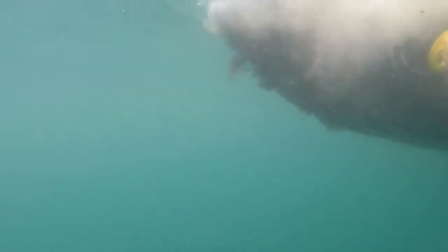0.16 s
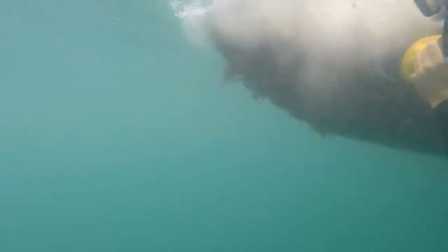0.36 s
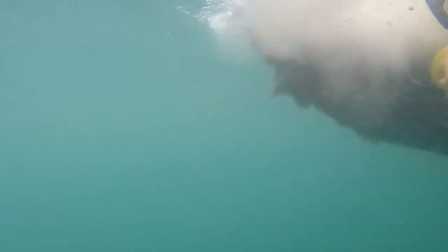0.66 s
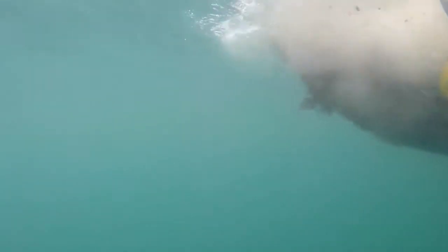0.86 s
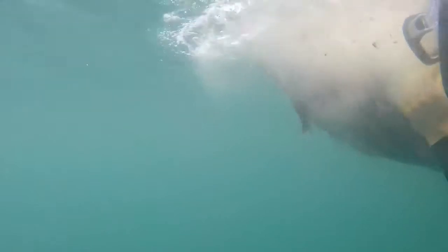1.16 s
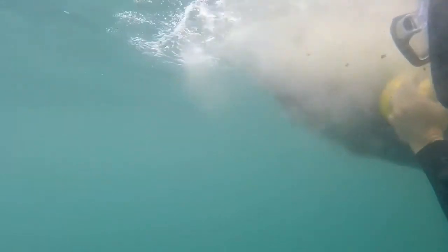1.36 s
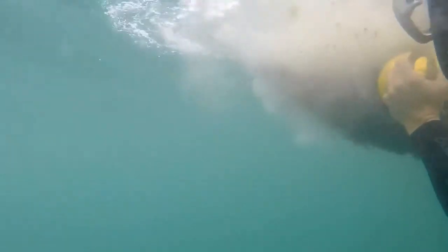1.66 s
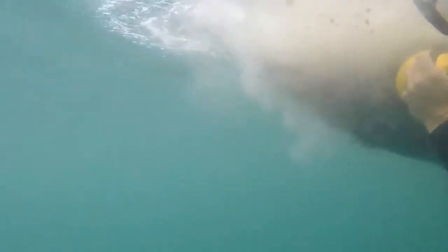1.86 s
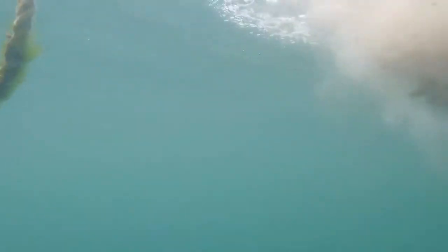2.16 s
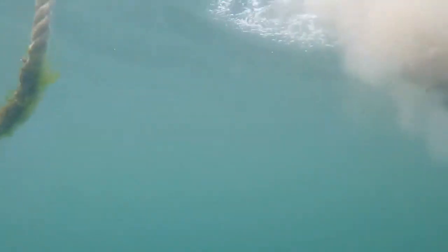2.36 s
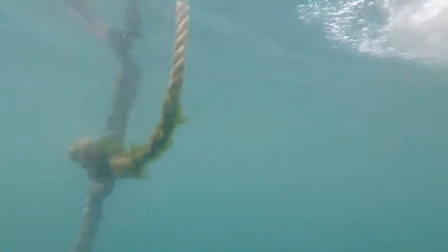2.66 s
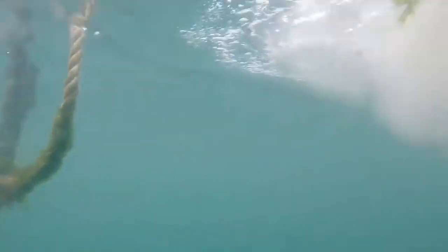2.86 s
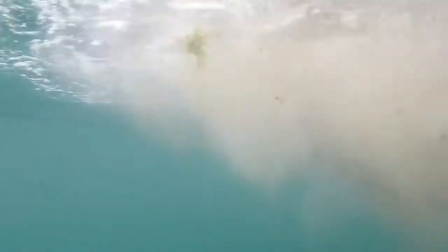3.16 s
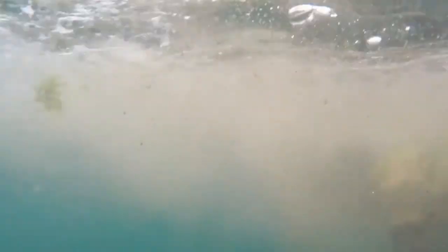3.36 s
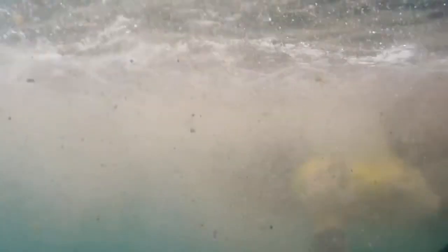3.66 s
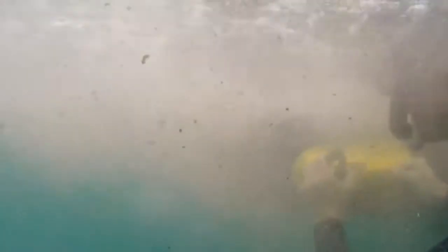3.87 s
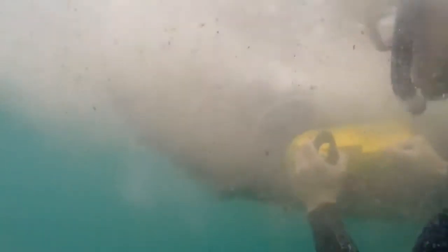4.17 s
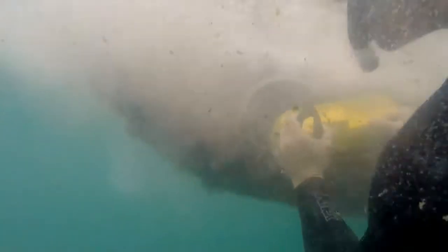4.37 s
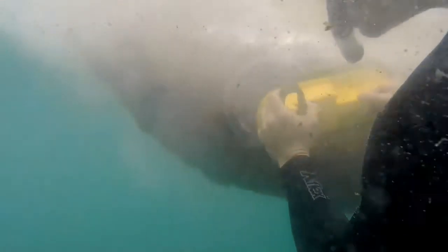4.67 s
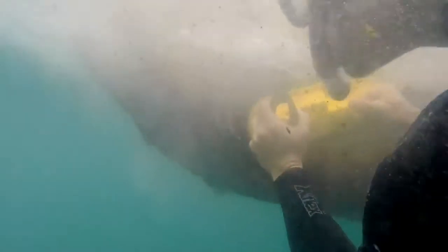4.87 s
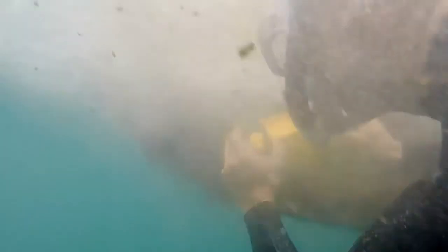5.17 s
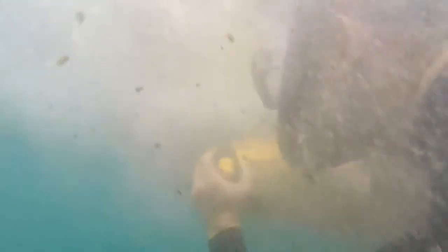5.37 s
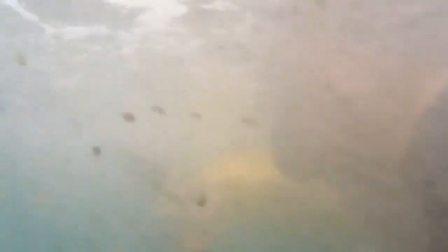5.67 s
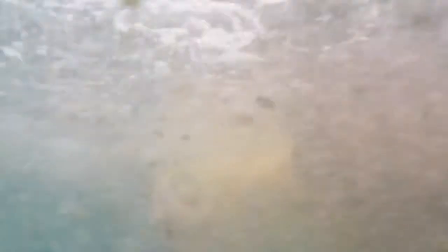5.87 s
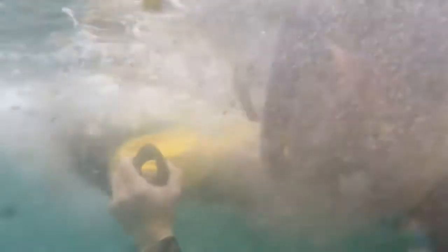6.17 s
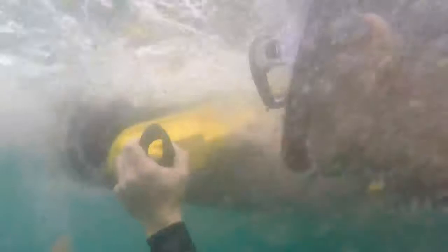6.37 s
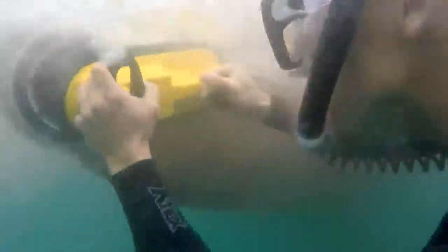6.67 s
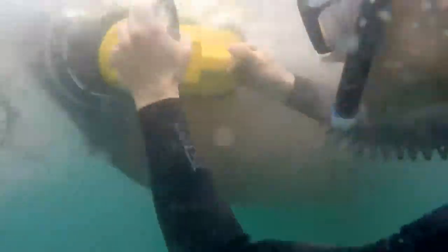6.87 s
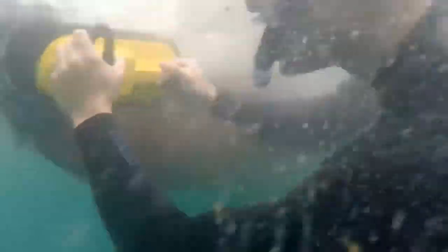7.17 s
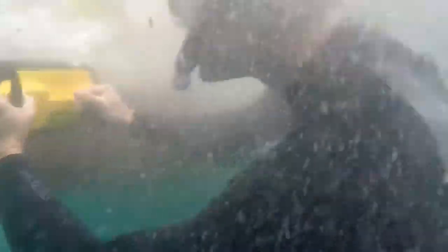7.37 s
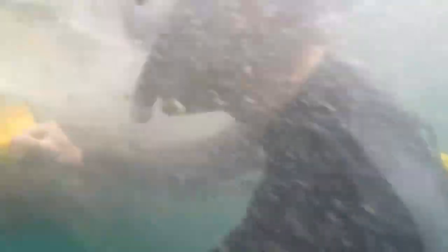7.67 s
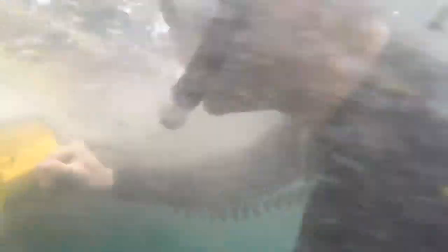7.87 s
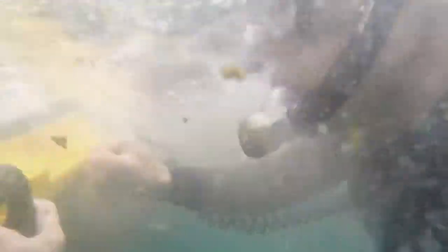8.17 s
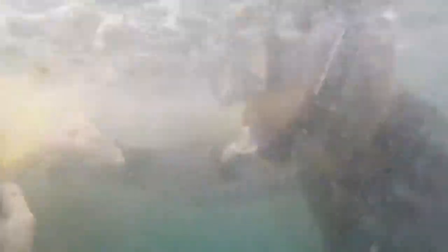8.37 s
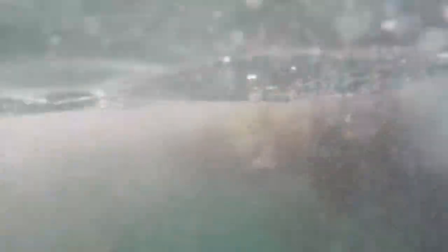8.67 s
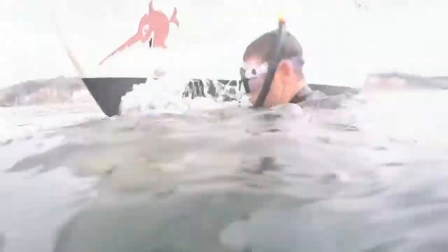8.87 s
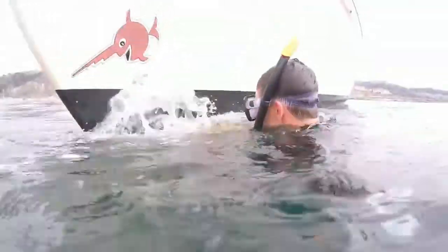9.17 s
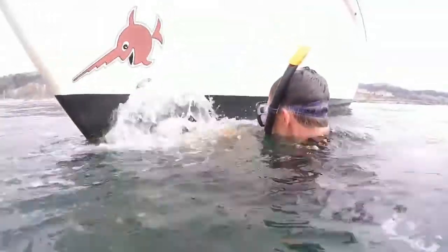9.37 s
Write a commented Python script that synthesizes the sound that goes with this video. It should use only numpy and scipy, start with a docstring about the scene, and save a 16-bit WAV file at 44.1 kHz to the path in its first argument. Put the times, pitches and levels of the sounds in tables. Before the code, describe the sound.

Boxy gurgling and low churning underwater, a hissing bubble cloud gathering midway, a heavy thump with hard knocks, then brief bright spatter in air.

```python
"""Under water beside a hull

A camera in a waterproof case is held just under the surface beside a boat's hull. Filtered pops and noise
churn and fizz through the case's resonances, over a deep rumble of low-passed noise. Decaying sines plink
as bubbles, gliding resonances sweep by as clouds and jets, pitch-sagging swells thud as gulps of air, and
blows ring the case. At the end the camera surfaces into open splashing."""
import sys
import numpy as np
from scipy import signal
from scipy.fft import rfft, irfft
from scipy.io import wavfile
from scipy.ndimage import uniform_filter1d, map_coordinates

SR = 44100
rng = np.random.default_rng(int(sys.argv[2]) if len(sys.argv) > 2 else 0)


def dump_mix(stems):
    """Bounce the given channels to the path in sys.argv[1] as a 16-bit WAV at rate SR."""
    frames = np.atleast_2d(stems).T  # one column per channel
    limited = np.clip(frames, -1, 1)  # hard clip at full scale
    pcm = np.round(limited * 32767).astype(np.int16)
    wavfile.write(sys.argv[1], SR, pcm)


N = 420273
TIME = np.arange(N) / SR
BINS = np.fft.rfftfreq(N, 1 / SR)
SURFACE_S = 8.85  # the camera leaves the water


# Flow along the hull. Each row: time in seconds, strength in dB.
FLOW_CURVE = [(0.0, -52.5), (0.47, -39.5), (2.23, -40.5), (3.77, -49.5), (4.71, -39), (5.28, -41.5),
              (5.62, -49), (5.92, -54.5), (6.52, -42), (7.98, -39.5), (8.23, -36), (8.55, -38), (8.9, -47)]
FLOW_USUAL_DB = -41.5


def flow_excess_db():
    """Flow strength above its usual value; it drives gurgle, churn and trickle."""
    return follow(FLOW_CURVE)[0] - FLOW_USUAL_DB


# Foam near the case. Each row: time in seconds, strength in dB.
FOAM_CURVE = [(0.0, -60.5), (0.45, -56), (1.19, -62), (3.05, -59), (3.3, -56.5), (3.44, -62.5),
              (3.72, -67.5), (3.97, -60), (4.16, -56.5), (4.31, -57), (5.67, -65.5), (5.92, -59),
              (6.24, -51.5), (6.72, -54), (8.16, -53.5), (8.65, -60.5), (8.9, -67)]
FOAM_USUAL_DB = -59


def foam_excess_db():
    """Foam strength above its usual value; it drives mainly the fizz."""
    return follow(FOAM_CURVE)[0] - FOAM_USUAL_DB


# Puffs of the finest fizz. Each row: loudest moment in seconds, level in dB.
MIST_PUFFS = [(.08, -80), (3.25, -65.5), (4.62, -68.5), (7.25, -69)]
PUFF_SWELL_S = 0.16


def rush(case, flow_db, foam_db):
    """Bubbles of four sizes sound through the case: large ones follow the flow, fine ones the foam."""
    gurgle_db = -41.5 + 0.77 * flow_db
    steady_trickle = amp(-51 + .3 * flow_db + 0.13 * foam_db)
    cloud_trickle = amp(follow(BUBBLE_CLOUD)[0] - 15) * (TIME > BUBBLE_CLOUD[0][0])
    trickle_db = 20 * np.log10(steady_trickle + cloud_trickle)
    fizz_db = -58 + 1.08 * foam_db
    puff_power = sum((amp(db) * swell(TIME, s, PUFF_SWELL_S)) ** 2 for s, db in MIST_PUFFS)
    mist_db = 10 * np.log10(amp(-72.0 + 0.092 * foam_db) ** 2 + puff_power)

    large = pops(250, 0.89, wash_db=0.5) + amp(-20) * blips(296.6, 809, per_s=90, cycles=8.3)
    gurgle = amp(gurgle_db + 0.85 * wander(12)) * shaped(large, case * band(186, 1407))
    small = pops(1200, 1.4, wash_db=1.5) + amp(-13) * blips(1162, 2600, per_s=150, cycles=9.5)
    trickle = amp(trickle_db + 1.13 * wander(18)) * shaped(small, case * band(1630, 3550))
    fine = pops(1200, 1.6, wash_db=-0.5)
    fizz = amp(fizz_db + 1.7 * wander(25)) * shaped(fine, case * band(4190, 9000))
    finest = pops(300, 5.5, wash_db=8)
    mist = amp(mist_db + 1.0 * wander(18)) * shaped(finest, case * band(9140, 16000))

    lower = swirl(gurgle + trickle, patch_db=1.73, patch_hz=398, patch_s=.07)
    upper = swirl(fizz + mist, patch_db=2.73, patch_hz=419, patch_s=.25)
    return lower + upper


# Dense cloud of bubbles. Each row: time in seconds, level in dB before trim, pitch in Hz.
BUBBLE_CLOUD = [(4.3, -53, 1200), (4.9, -39, 1150), (5.35, -31.5, 1510), (5.85, -29.5, 1870),
                (6.26, -29, 1980), (6.55, -41, 1770), (6.9, -47.5, 1750), (7.25, -42, 1870),
                (7.8, -37.5, 1930), (8.5, -44.5, 1560), (8.8, -47, 1890)]
# when and how fast its bubbles become alike, share that stays mixed
SORTED_S, SORTING_S, MIXED_LEFT = 5.42, .15, 0.067


def cloud(case, fine_ratio=1.27, fine_db=-9, fine_width_hz=800):
    """A cloud of bubbles rings around a gliding pitch, narrower once they are alike, finer ones above."""
    level_db, hz = follow(BUBBLE_CLOUD)
    drive = pops(900, 0.78, wash_db=1) * amp(0.54 * wander(45))
    narrow = evened(resonate_twice(drive, hz, 320))
    wide = evened(resonate_twice(drive, hz, 1400))
    fine = evened(resonate_twice(rng.standard_normal(N), fine_ratio * hz, fine_width_hz))
    fine *= amp(fine_db + 1.9 * (level_db + 29))  # a denser cloud holds more fine bubbles
    unsorted_share = .5 * (1 - np.tanh((TIME - SORTED_S) / SORTING_S))
    mixed = MIXED_LEFT + (1 - MIXED_LEFT) * unsorted_share
    ring = shaped((1 - mixed) * narrow + mixed * wide + fine, case * band(850, 3100))
    ring = swirl(ring, patch_db=1.3, patch_hz=160, patch_s=.07)
    ring /= np.sqrt(uniform_filter1d(ring ** 2, SR // 5) + 1e-6)  # even out slow level swings
    fade_in = np.clip((TIME - BUBBLE_CLOUD[0][0]) / 0.078, 0, 1)
    return ring * amp(level_db - 3.05) * fade_in


# Narrow jets of fine bubbles. Each row: loudest moment in seconds, whistle level in dB,
# swell time in seconds, pitch at the loudest moment in Hz, glide in Hz per second.
BUBBLE_JETS = [(2.5, -51, 0.32, 2220, 0), (2.85, -52.5, 0.24, 3490, 300), (4.3, -61.5, 0.24, 6700, -600),
               (4.45, -52.5, 0.22, 3350, 94), (5.4, -46.5, 0.24, 3310, 198), (6.15, -36, 0.079, 3420, 300),
               (6.42, -54, 0.068, 6860, -1), (7.45, -51.5, .25, 4130, 495), (7.8, -57, 0.66, 6360, -2),
               (8.04, -36, 0.17, 3457, -600), (8.33, -42.5, .11, 3366, 1300)]


def jet(case_hz=2700, case_db=-7, case_width_hz=380, spread=0.1):
    """Each jet swells and fades as a fuzzy, gliding whistle and stirs a fixed mode of the case."""
    out = np.zeros(N)
    drive = pops(1500, 2.4, wash_db=-4.5) * amp(2.2 * wander(30))
    body = evened(resonate_twice(drive, case_hz, case_width_hz))
    for s, db, swell_s, peak_hz, glide_hz_per_s in BUBBLE_JETS:
        near = abs(TIME - s) < 3 * swell_s
        hz = peak_hz + glide_hz_per_s * (TIME[near] - s)
        whistle = evened(resonate_twice(drive[near], hz, spread * peak_hz))
        out[near] += amp(db) * swell(TIME[near], s, swell_s) * (whistle + amp(case_db) * body[near])
    return out


# Quick, even train of bubbles. Each row: time in seconds, level in dB, rate in bubbles per second,
# overtone level in dB re the purr.
FLUTTER_CURVE = [(7.3, -44.5, 49, -20), (7.8, -49.5, 45.5, -28), (8.1, -35.5, 44.6, -34),
                 (8.35, -38, 53.6, -15), (8.6, -39, 54, 2), (8.75, -72, 63, 20)]


def flutter():
    """Bubbles pinch off one after another: a pulse train through resonances makes a low purr."""
    level_db, rate_hz, overtone_db = follow(FLUTTER_CURVE)
    turns = np.floor(np.cumsum(rate_hz * (1 + .025 * wander(16))) / SR)
    pulses = np.diff(turns, prepend=0) * amp(0.76 * wander(23))
    purr = evened(resonate(resonate(pulses, 333, 210), 330, 170))
    # the overtone rises as the train speeds up
    overtone = evened(resonate(resonate(pulses, 13.8 * rate_hz, 150), 14.2 * rate_hz, 140))
    active = (TIME > FLUTTER_CURVE[0][0]) * (TIME < FLUTTER_CURVE[-1][0])
    return (purr + amp(overtone_db) * overtone) * amp(level_db) * active


# Low thuds of air and water. Each row: start in seconds, gulp level in dB, nominal pitch in Hz,
# level of the boom in dB.
AIR_THUDS = [(.208, -14.5, 88, -40), (0.685, -17, 79, -27), (1.499, -13, 80, -20), (2.085, -17.5, 143, -19),
             (3.161, -21.5, 145, -21.5), (3.278, -24, 148, -38), (3.843, -21.5, 67, -24),
             (4.356, -17.5, 88.4, -44), (6.4, -15, 134, -38), (6.457, -7.5, 144, -38),
             (6.467, 1.5, 59.7, -9.5), (6.959, -8, 115.5, -10), (7.647, -18.5, 92, -41),
             (8.065, -16.5, 110, -43), (8.115, -14.5, 84.4, -40), (8.56, -14, 106, -15.5)]


def thuds(boom_hz=50.55, boom_t60_s=1.33):
    """A gulp with a long, deep boom: a slowly decaying low sine."""
    out, t = np.zeros(N), np.arange(SR) / SR
    boom = amp(-60 * t / boom_t60_s) * (1 - np.exp(-t / 0.0084)) * np.sin(2 * np.pi * boom_hz * t)
    for s, db, hz, boom_db in AIR_THUDS:
        add(out, s, amp(db) * gulp(hz) + amp(boom_db) * boom)
    return out


GLUG_START_S, GLUGS_PER_S, GLUG_HZ = 4.964, 23.2, 105.3
GLUG_MIDDLE_DB, GLUG_FALL_DB = -9, 1.8  # fall per glug to either side


def glugs(count=5, uneven_s=0.0023):
    """A pocket of air escapes in a loose run of gulps, strongest in the middle."""
    out = np.zeros(N)
    for k in range(count):
        s = GLUG_START_S + k / GLUGS_PER_S + uneven_s * rng.standard_normal()
        hz = GLUG_HZ * rng.uniform(0.78, 1.11)
        db = GLUG_MIDDLE_DB - GLUG_FALL_DB * abs(k - count // 2)
        add(out, s, amp(db) * gulp(hz))
    return out


THUD_CYCLES = 0.93  # nominal cycles that a gulp takes to swell


def gulp(hz, sag=0.45):
    """A swell of a few cycles whose pitch sags from hz * (1 + sag) toward hz * (1 - sag)."""
    u = np.arange(SR) / SR * hz / THUD_CYCLES
    turns = np.cumsum(hz * (1 + sag * (np.exp(-u / 2) - .5) * 2)) / SR
    return (u * np.exp(1 - u)) ** 1.58 * np.sin(2 * np.pi * turns)


# Knocks on the case. Each row: start in seconds, level in dB before trim, t60 in seconds.
CASE_KNOCKS = [(1.708, -32, .032), (1.986, -25, 0.12), (2.071, -26, 0.062), (2.685, -22.5, 0.046),
               (6.214, -26, 0.075), (6.385, -20.5, .12), (6.458, -13, 0.043), (6.62, -26, 0.045),
               (6.946, -13.5, 0.072), (7.438, -20, 0.05), (8.674, -19, 0.034)]


def knocks():
    """Short blows ring the lowest modes of the case."""
    out = np.zeros(N)
    for s, db, t60_s in CASE_KNOCKS:
        add(out, s, amp(db - 7.5) * case_ring(t60_s))
    return out


# Single bubbles close by. Each row: start in seconds, level in dB, starting pitch in Hz, t60 in seconds.
BUBBLE_PLINKS = [(.5483, -25, 1600, 0.03), (1.262, -21, 1900, .021), (1.474, -19, 1790, 0.015),
                 (1.509, -30.5, 1500, 0.063), (2.629, -24, 1600, 0.034), (3.139, -35, 1210, 0.053),
                 (3.496, -14, 2100, 0.0063), (3.5597, -14, 1860, 0.012), (3.6217, -20.5, 1640, .026),
                 (3.712, -23, 1580, .028), (3.8467, -24.5, 1620, 0.033), (6.1888, -17.5, 2050, 0.043),
                 (6.2726, -17.5, 1896, 0.035), (6.577, -27.5, 534, 0.22), (6.945, -25, 1700, .032),
                 (7.144, -17.5, 1680, 0.014), (7.44, -21, 2280, .021), (7.5075, -19.5, 2040, 0.014),
                 (8.2694, -23, 1590, 0.02), (8.3584, -21.5, 1940, 0.018), (8.475, -26, 1610, 0.062),
                 (8.5118, -24, 1580, 0.026), (8.577, -26.5, 2006, .028), (8.673, -28.5, 1980, 0.023),
                 (8.843, -35.5, 1060, 0.046), (8.947, -37, 446, 0.09), (9.288, -19, 1900, 0.021),
                 (9.34, -24, 2120, .013), (9.4598, -4.5, 1980, 0.0016)]
NUDGE_DB, NUDGE_T60_S = -12, .02  # case ring re the bubble


def plinks(phase_creep_per_s=.5, onset_s=0.00025):
    """Each bubble snaps free and rings, its pitch creeping upward; under water it nudges the case."""
    out, t = np.zeros(N), np.arange(SR // 5) / SR
    for s, db, hz, t60_s in BUBBLE_PLINKS:
        tone = np.sin(2 * np.pi * hz * t * (1 + phase_creep_per_s * t))
        ring = tone * amp(-60 * t / t60_s) * (1 - np.exp(-t / onset_s))
        nudge = amp(NUDGE_DB) * case_ring(NUDGE_T60_S) * (s < SURFACE_S)
        add(out, s, amp(db) * (ring + nudge))
    return out


# Sharp ticks on the case. Each row: start in seconds, peak in dB before trim, centre in Hz,
# width of each resonance in Hz.
CASE_TICKS = [(1.36, -37, 7000, 6000), (3.451, -36, 7640, 1200), (3.9545, -36, 7600, 1400),
              (4.6079, -34, 3780, 900), (5.532, -40.5, 6950, 5000), (5.637, -41, 12000, 3500),
              (6.3593, -46, 13500, 3000), (7.5247, -40, 13000, 6000), (8.735, -25.5, 5000, 2920)]


def ticks():
    """Tiny bubbles and grit click on the case: brief noise through a resonance."""
    out, t = np.zeros(N), np.arange(SR // 20) / SR
    for s, db, hz, width_hz in CASE_TICKS:
        crack = rng.standard_normal(len(t)) * np.exp(-t / 0.0015)
        tick = resonate_twice(crack, hz, width_hz)
        add(out, s, amp(db + 1.5) * tick / abs(tick).max())
    return out


# Splashing in the air. Each row: time in seconds, level in dB.
SPLASH_CURVE = [(8.75, -48), (8.95, -46.5), (9.05, -43), (9.17, -40), (9.33, -41), (9.42, -43), (9.53, -40)]
# Splash spectrum. Each row: frequency in Hz, relative level in dB.
SPLASH_SPECTRUM = [(200, -17), (450, -21.5), (850, -24), (1400, -17.5), (1940, -6.5), (3000, -7.5),
                   (3800, -21), (5050, -18), (6700, -25), (9000, -31), (12500, -35), (15500, -45)]


def splash():
    """Above the surface, water spatters and drips beside the hull: dense pops and short blips."""
    level_db, = follow(SPLASH_CURVE)
    spray = pops(4500, 3.2, wash_db=0)
    drips = blips(1000, 6000, per_s=900, cycles=3.5)
    spatter = shaped(spray + amp(-7) * drips, colour(SPLASH_SPECTRUM))
    return amp(level_db) * swirl(spatter, patch_db=1.3, patch_hz=700, patch_s=.04)


# Surges of water that shove the case. Each row: start in seconds, length in seconds,
# rumble level in dB before trim.
WATER_SURGES = [(.18, 0.23, -24), (0.838, 0.55, -25), (2.087, 1.82, -27), (4.28, 0.33, -24.5),
                (4.954, 0.16, -22), (5.37, 1.34, -27.5), (6.412, 0.9, -20.5), (7.44, 1.11, -24.5)]
SURGE_ATTACK_S, SURGE_RELEASE_S, CALM_DB = 0.05, 0.18, -35
# Rumble spectrum. Each row: frequency in Hz, relative level in dB.
RUMBLE_SPECTRUM = [(10, -44), (22, 4), (36, 0.5), (51, 3), (70, -1.5), (95, -11), (130, -20), (200, -51)]
# Churn spectrum. Each row: frequency in Hz, relative level in dB.
CHURN_SPECTRUM = [(60, -27), (105, 6), (135, -4), (168, 4), (215, -8.5), (280, -15.5), (450, -19)]


def rumble(flow_db, air, churn_db=-37.0, churn_follow=0.51, churn_air_db=-51, churn_surge=0.32):
    """Surges of eddies shove the case, with a lumpy churn above them that follows the flow."""
    power = amp(CALM_DB) ** 2
    for s, length_s, db in WATER_SURGES:
        rise = np.clip((TIME - s) / SURGE_ATTACK_S, 0, 1)
        fall = np.exp(-np.maximum(TIME - s - length_s, 0) / SURGE_RELEASE_S)
        power = power + (amp(db - 1.0) * rise * fall) ** 2
    deep = np.sqrt(power) * eddies(RUMBLE_SPECTRUM, even_s=0.17)
    surge_gain = (power / power.mean()) ** (churn_surge / 2)
    churn_under = amp(churn_db + churn_follow * flow_db) * surge_gain
    churn_gain = (1 - air) * churn_under + air * amp(churn_air_db)
    return deep + churn_gain * amp(3.25 * wander(14)) * eddies(CHURN_SPECTRUM, even_s=0.13)


def whine():
    """The camera's faint electronic whine: a wavering sine that pulses with its frame rate."""
    frame_pulse = 1 + np.cos(2 * np.pi * 29.7 * TIME)
    tone = np.sin(2 * np.pi * np.cumsum(8631 + 5 * wander(18)) / SR)
    return amp(-79.5) * frame_pulse * tone


# Resonances of the case. Each row: centre in Hz, width scale in Hz, relative level in dB.
CASE_MODES = [(353, 560, -7), (607.3, 157, 3.5), (767, 207, -8), (1163, 125, -14.5), (1500, 350, -14.5),
              (1980, 1600, -13), (2750, 390, -13), (3513, 590, -9.5), (4120, 660, -28.5),
              (5040, 1340, -31.5), (6330, 880, -28), (7300, 1770, -37), (9400, 2600, -45),
              (12940, 5200, -47.5)]


def case_response():
    """Gain per bin of the case: power sum of its resonances."""
    gains = (amp(db) / (1 + ((BINS - hz) / width_hz) ** 2) ** 3 for hz, width_hz, db in CASE_MODES)
    return np.sqrt(sum(gain ** 2 for gain in gains))


def case_ring(t60_s):
    """Four lowest modes of the case after a short blow, each slightly detuned at random."""
    t = np.arange(SR // 5) / SR
    ring = sum(amp(mode_db) * np.sin(2 * np.pi * hz * rng.uniform(0.9, 1.05) * t)
               for hz, _, mode_db in CASE_MODES[:4])
    return amp(-60 * t / t60_s) * ring * (1 - np.exp(-t / 0.00068))


def pops(per_s, spread_db, wash_db):
    """Countless bursting bubbles: near ones as clicks of uneven size, far ones merged into a wash."""
    size = amp(spread_db * np.minimum(rng.exponential(1, N), 5)) * rng.choice([-1, 1], N)
    clicks = evened(size * (rng.random(N) < per_s / SR))
    return evened(clicks + amp(wash_db) * rng.standard_normal(N))


def blips(lo_hz, hi_hz, per_s, cycles, count=16):
    """Scattered single bubbles, each ringing a few cycles with a rising pitch."""
    out, t = np.zeros(N), np.arange(SR // 12) / SR
    for hz in np.geomspace(lo_hz, hi_hz, count):
        u = hz * t / cycles
        chance = rng.random(N) * (SR * count / per_s)  # below 1: a bubble starts here
        ring = np.sin(2 * np.pi * hz * t * (1 + 0.019 * u)) * np.exp(-u) * (1 - np.exp(-6 * u))
        for at in np.flatnonzero(chance < 1):
            add(out, at / SR, amp(-14 * chance[at]) * ring)
    return evened(out)


def eddies(points, even_s):
    """Low turbulent pressure, of fairly even strength over spans longer than even_s."""
    x = shaped(rng.standard_normal(N), colour(points))
    return x / np.sqrt(uniform_filter1d(x ** 2, int(even_s * SR) + 1) + 1e-3)


def swirl(x, patch_db, patch_hz=500, patch_s=.12):
    """Drifting bubbles bring out one band, then another: random gain patches in time and frequency."""
    hz, s, z = signal.stft(x, SR, nperseg=512)
    grid = np.meshgrid(hz / patch_hz, s / patch_s, indexing="ij")
    patches = evened(map_coordinates(rng.standard_normal((80, 200)), grid, order=1, mode="wrap"))
    return signal.istft(z * amp(patch_db * patches), SR, nperseg=512)[1][:N]


def swell(t, peak_s, swell_s):
    """A bell-shaped rise and fall as something drifts past."""
    return np.exp(-.5 * ((t - peak_s) / swell_s) ** 2)


def wander(hz):
    """Slow chance of rms 1, with about hz swings a second."""
    knots = rng.standard_normal(4000)
    return evened(np.interp(TIME * 2 * hz, np.arange(len(knots)), knots))


def resonate(x, hz, width_hz):
    """A one-pole resonance of about unit gain that can follow a pitch curve."""
    turn = np.exp(2j * np.pi * np.cumsum(hz * np.ones(len(x))) / SR)
    r = np.exp(-np.pi * width_hz / SR)
    # shift the pitch to 0 Hz, low-pass, shift back
    return 2 * (turn * signal.lfilter([1 - r], [1, -r], x / turn + 1e-18)).real


def resonate_twice(x, hz, width_hz):
    """Two equal resonances in series, for steeper skirts."""
    return resonate(resonate(x, hz, width_hz), hz, width_hz)


def colour(points):
    """Gain per bin from a short spectrum, rolled off above its last point."""
    hz, db = np.transpose(points)
    return amp(np.interp(np.log(BINS + 1), np.log(hz), db)) / (1 + (BINS / hz[-1]) ** 8)


def band(lo_hz, hi_hz):
    """Gain per bin of a steep band-pass."""
    return 1 / np.sqrt((1 + (lo_hz / (BINS + 1)) ** 20) * (1 + (BINS / hi_hz) ** 20))


def shaped(x, gain):
    """Filters x by a gain per bin, to rms 1."""
    return evened(irfft(rfft(x) * gain, N))


def follow(rows):
    """Each column of a curve table, interpolated at every sample."""
    s, *columns = np.transpose(rows)
    return [np.interp(TIME, s, c) for c in columns]


def add(mix, s, sound):
    """Mixes a sound in at time s."""
    part = mix[max(round(s * SR), 0):][:len(sound)]
    part += sound[:len(part)]


def evened(x):
    """Scales to rms 1."""
    return x / np.sqrt(np.mean(x ** 2) + 1e-20)


def amp(db):
    """Decibels to gain."""
    return 10 ** (np.asarray(db) / 20)


def scene():
    """Underwater sounds give way to open splashing as the camera comes up."""
    case = case_response()
    air = np.clip((TIME - SURFACE_S) / 0.29 + .5, 0, 1)  # 0 under water, 1 above
    flow_db, foam_db = flow_excess_db(), foam_excess_db()
    under = rush(case, flow_db, foam_db) + cloud(case) + jet() + flutter()
    water = np.sqrt(1 - air) * under + np.sqrt(air) * splash()
    hits = thuds() + glugs() + knocks() + plinks() + ticks()
    return (water + hits + rumble(flow_db, air) + whine())[None]


EDGE_HZ = 15550


def record(dry):
    """Rounds off the loudest peaks, then low-passes at EDGE_HZ."""
    rounded = dry / (1 + (dry / .95) ** 8) ** (1 / 8)
    lowpass = signal.firwin(511, EDGE_HZ, window=("kaiser", 9), fs=SR)
    return signal.oaconvolve(rounded, lowpass[None], "same")


dry = scene()
out = record(dry)
dump_mix(out)
```